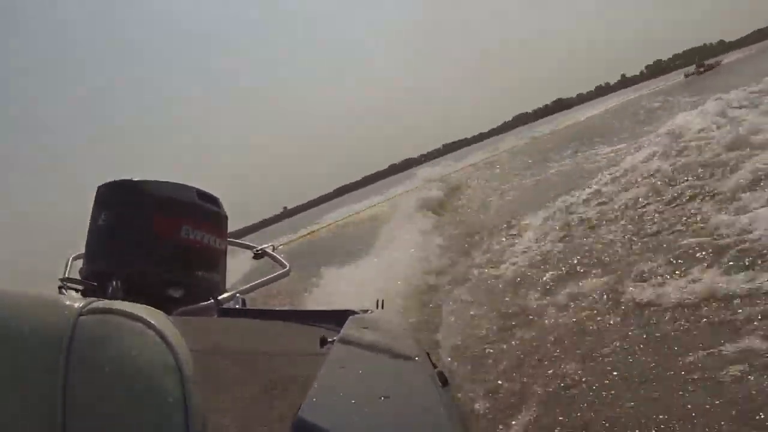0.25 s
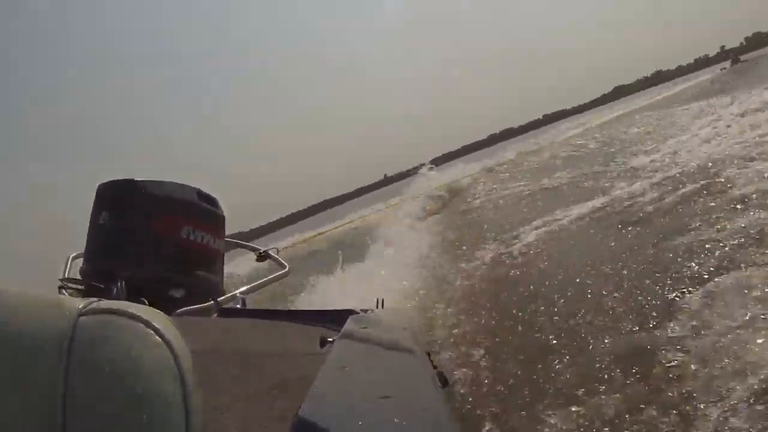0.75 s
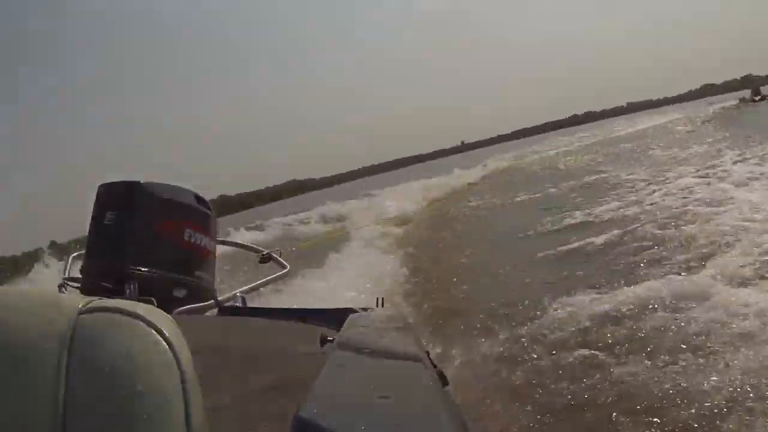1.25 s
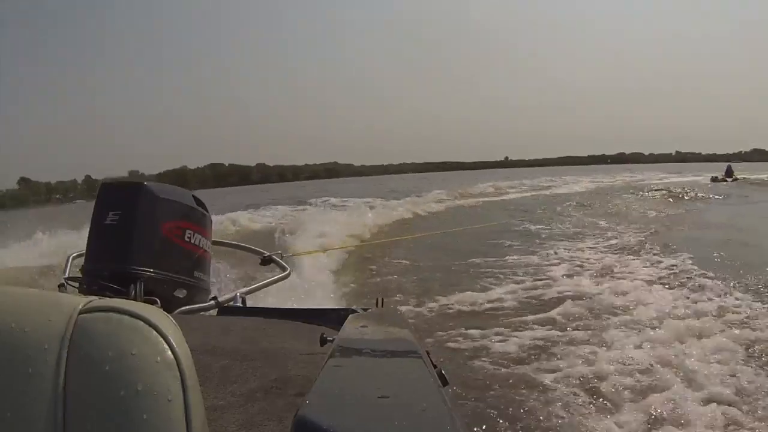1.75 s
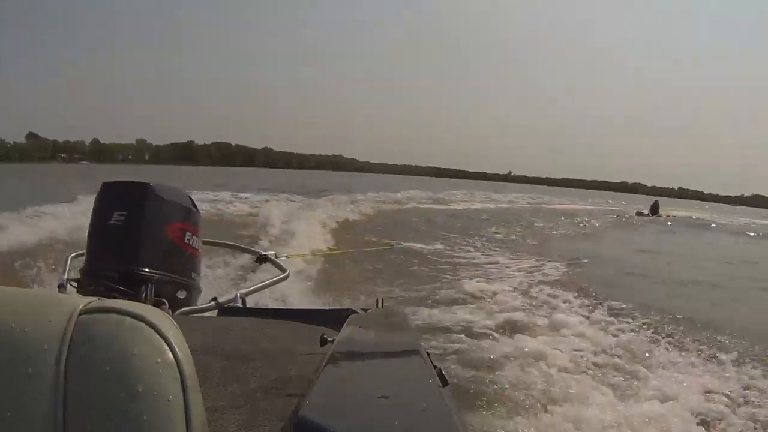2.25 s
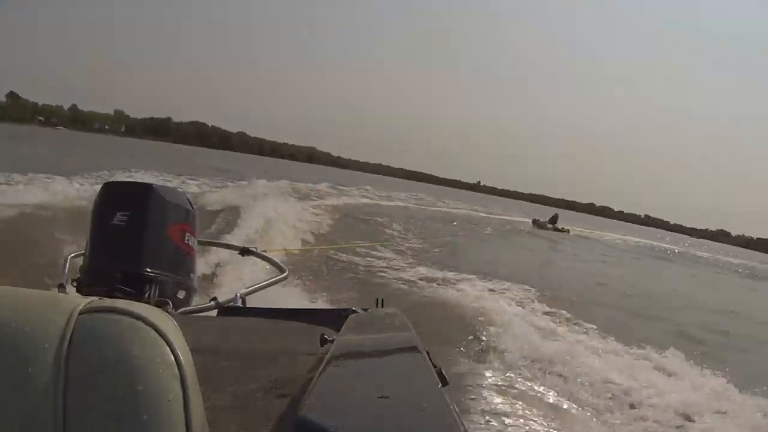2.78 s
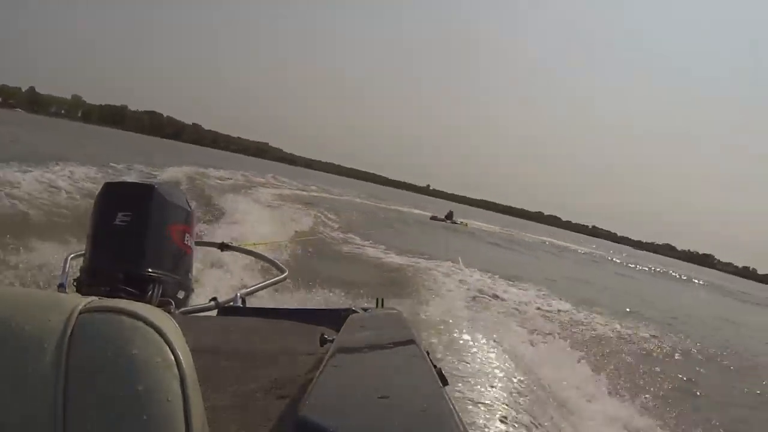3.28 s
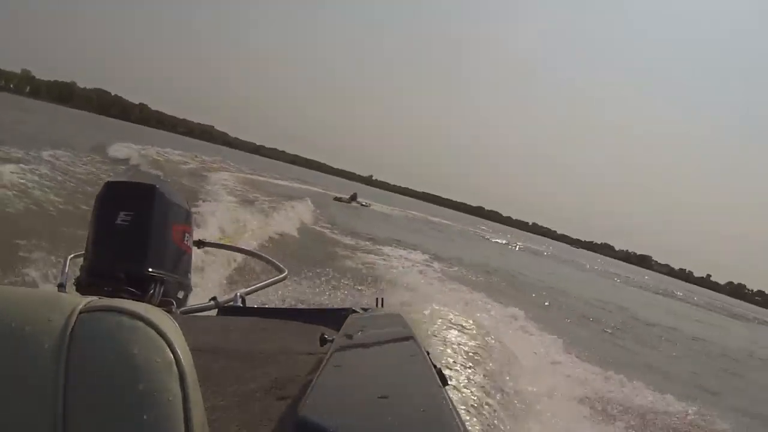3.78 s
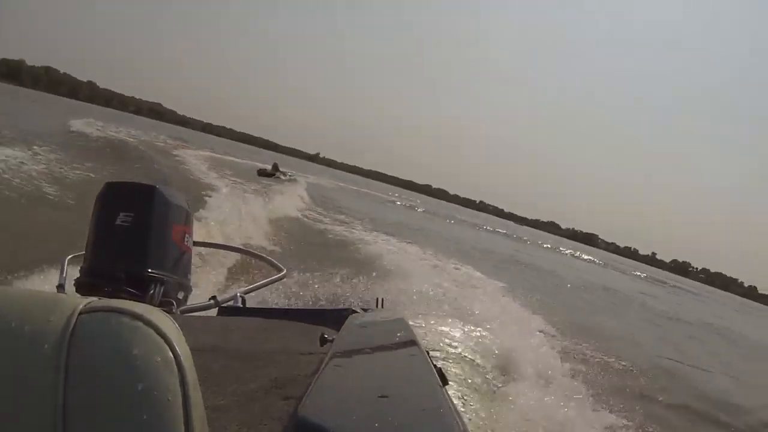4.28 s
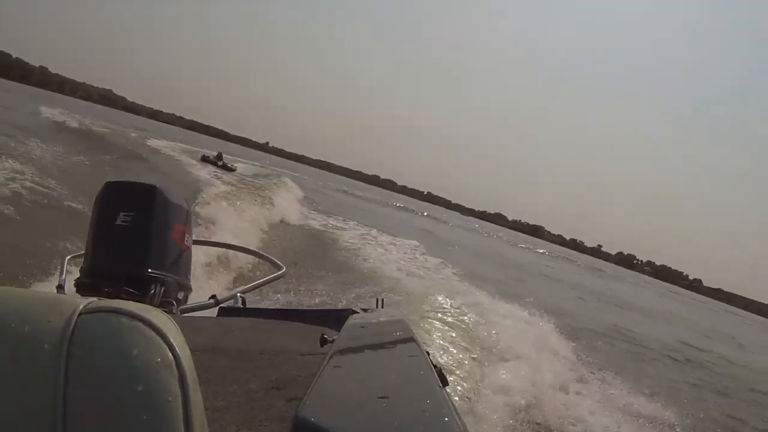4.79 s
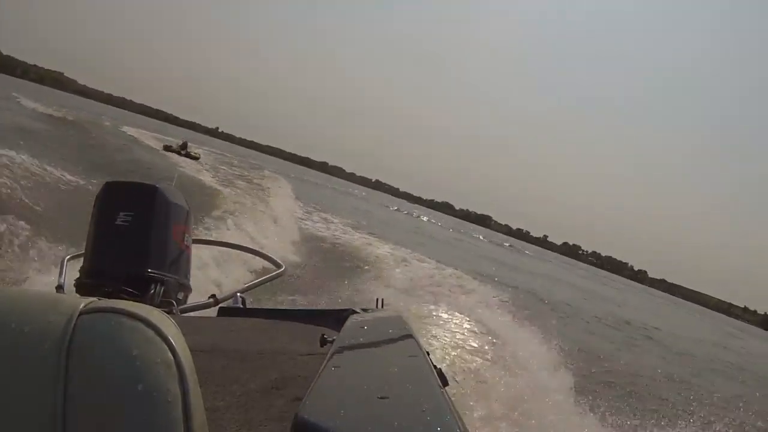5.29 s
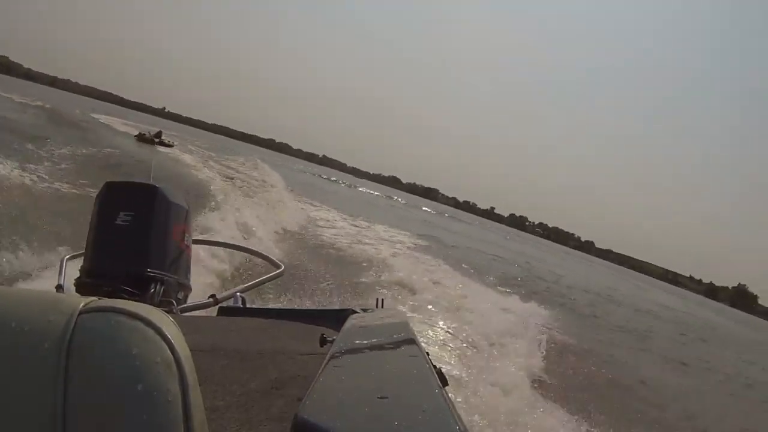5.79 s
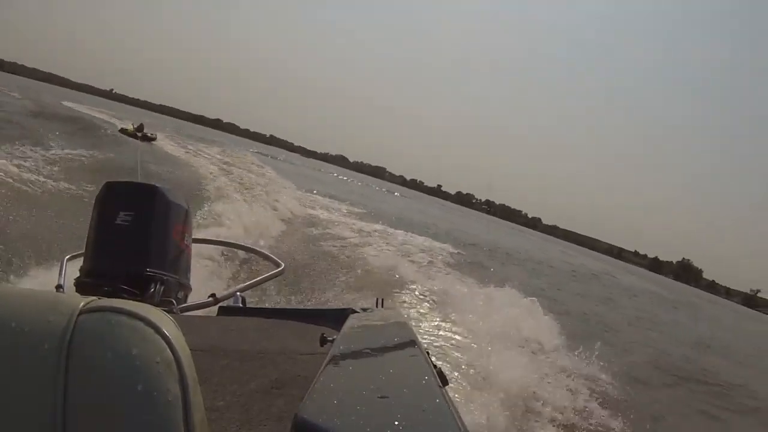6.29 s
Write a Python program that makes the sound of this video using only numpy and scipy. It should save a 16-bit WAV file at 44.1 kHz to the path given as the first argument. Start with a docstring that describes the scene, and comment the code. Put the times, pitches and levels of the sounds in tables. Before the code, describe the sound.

On board a speeding boat, the hull judders with a low rumble while the microphone's mount chatters with close, gritty knocks. Something loose clacks briefly. As the boat levels out, the outboard motor behind opens into a louder drone and snarl, and the wake churns and hisses with bursts of spray. The knocks thin to single thumps on the chop, the engine grows rougher and surges, and wind buffets the microphone throughout.

```python
"""A juddering hull and a chattering camera mount, close to a microphone fixed on board a boat in a fast turn.
As the boat levels out, the outboard motor opens up astern: engine tones and rough exhaust ring in its
leg and cowl as a drone and a snarl, while the wake churns and hisses with spray. Waves shake the hull,
the chop gives single knocks, something loose clacks early on and wind buffets the microphone."""
import sys
import numpy as np
from scipy import signal
from scipy.fft import rfft, irfft, next_fast_len
from scipy.io import wavfile

SR = 44100
rng = np.random.default_rng(int(sys.argv[2]) if len(sys.argv) > 2 else 0)


def store_pcm(level_fs):
    """Save levels as 16-bit WAV."""
    pcm = np.round(np.clip(level_fs, -1, 1) * 32767).astype(np.int16)
    wavfile.write(sys.argv[1], SR, np.atleast_2d(pcm).T)


N = 288409
TIME = np.arange(N) / SR
ROLL_START_S, ROLL_S = 1.16, 1.18  # the boat rolls out of its bank

# Knocks of the camera mount, right at the microphone. Each row: time in seconds, strength in dB.
MOUNT_KNOCKS = [(0.055, -14), (0.083, -19.5), (0.136, -20.5), (0.151, -14.5), (0.193, -15.5),
                (0.219, -11.5), (0.233, -11.5), (0.246, -18.5), (0.258, -13.5), (0.283, -11),
                (0.361, -14.5), (0.39, -13), (0.434, -11), (0.447, -18), (0.461, -12.5), (0.5, -13.5),
                (0.602, -17.5), (0.63, -10), (0.718, -19.5), (0.744, -12), (0.795, -16.5), (0.83, -21),
                (0.855, -13.5), (0.883, -14.5), (0.932, -19.5), (0.944, -13), (0.961, -15.5), (0.994, -16),
                (1.021, -20), (1.062, -14), (1.135, -12.5), (1.206, -16), (1.246, -12), (1.262, -14),
                (1.315, -16.5), (1.359, -14), (1.42, -12.5), (1.445, -15), (1.504, -15), (2.178, -13),
                (2.216, -17), (2.25, -14.5), (2.295, -15), (2.33, -12.5), (2.588, -13.5), (2.656, -13.5),
                (2.994, -10), (3.123, -11.5), (3.248, -11.5), (3.374, -12.5), (3.407, -14.5),
                (3.507, -14.5), (3.543, -15.5), (3.748, -14.5), (3.996, -12.5), (4.212, -15.5),
                (4.993, -11.5), (5.031, -19.5)]


def outboard(cruise_hz=44.77, throb=0.17, first_crest_s=4.397, surge_period_s=0.682, surge_db=2):
    """The motor astern: tones and exhaust noise, throbbing once a cycle, share the same resonances."""
    # Engine speed. Each row: time in seconds, cycles per second.
    engine_speed = [(0.0, 44.2), (0.36, 45.1), (0.8, 44.3), (1.02, 44.7), (1.37, 43.5), (1.42, 44.3),
                    (2.79, 44.5), (2.9, 44.1), (3.82, 45.1), (4.1, 44.6), (4.5, 45.2), (4.75, 44.5),
                    (5.04, 45.3), (5.45, 44.7), (6.08, 46.2), (6.21, 45.3), (6.36, 46.3), (6.54, 48.7)]
    # Low and high engine tones. Each row: multiple of the cycle, level in dB before the resonances.
    drone_orders = [(5, -3), (6, -5), (7, -2.5), (8, -4)]
    snarl_orders = [(11, -6), (12, -2.5), (13, -3.5), (14, -6), (18, 0), (19, 0.5), (24, -15)]
    # Resonances of the motor's leg and cowl. Each row: centre in Hz, width in Hz, gain in dB.
    drone_modes = [(217, 69, -7), (297.3, 46.5, -4.5), (342, 88, -8)]
    snarl_modes = [(502.8, 30.4, -3), (549, 68, -5.5), (608, 42, 1.5), (800.5, 98, -13), (1095, 200, -22.5)]
    speed, = curves(engine_speed)
    turns = np.cumsum(speed) / SR
    puffs = noise() * (1 + throb * np.cos(2 * np.pi * turns))
    roughness = gain_of(-10 + 1.36 * TIME)  # the exhaust grows rougher
    drone = engine_tones(turns, speed, drone_orders, drone_modes)
    drone += roughness * resonant(puffs, drone_modes)
    snarl = engine_tones(turns, speed, snarl_orders, snarl_modes)
    snarl += gain_of(3) * roughness * resonant(puffs, snarl_modes)
    # The drone opens early in the roll, grows with speed and fades late in the turn.
    drone *= rolled(banked_db=-27.5, level_db=-17, roll_s=0.69)
    drone *= gain_of(1.57 * (speed - cruise_hz) - 2 * np.maximum(TIME - 3.7, 0))
    # The snarl opens with the roll and keeps growing; later the engine labours in regular surges.
    surges = np.maximum((TIME - first_crest_s) / surge_period_s, -3 / 4)
    snarl *= rolled(banked_db=-34.5, level_db=-28)
    snarl *= gain_of(0.13 * TIME + surge_db * np.cos(2 * np.pi * surges))
    return drone + snarl


def engine_tones(turns, speed, orders, modes):
    """Multiples of the engine cycle swell and fade as the speed carries them through the resonances."""
    tones = np.zeros(N)
    for order, db in orders:
        flutter = gain_of(1.4 * wander(12))
        phase = 2 * np.pi * (order * turns + rng.random()) + .022 * order * wander(9)
        tones += np.sqrt(2) * gain_of(db) * response(order * speed, modes) * flutter * np.cos(phase)
    return tones


def hull(shake_hz=34, unsteady=0.083, hum_db=-30, drum_throb=0.4):
    """Under the microphone the hull hums and shakes at a low resonance on each wave; the deck drums."""
    # Waves that set the hull shaking. Each row: start in seconds, length in seconds, level in dB.
    waves = [(-.05, 0.65, -17.5), (.58, 0.42, -13.5), (1.08, 0.15, -25), (2.18, 0.36, -20.5),
             (2.52, 0.59, -21.5), (3.42, 0.53, -21.5), (3.92, 0.81, -17.5), (4.78, 0.92, -21),
             (5.53, 0.71, -23)]
    # Resonances of the deck and of the hull. Each row: centre in Hz, width in Hz, relative gain in dB.
    deck_modes = [(140.5, 15.4, 2), (199, 41, -3.5), (211.5, 13.6, -10)]
    hull_modes = [(73, 11, 0), (93, 12, -7)]
    wavering_hz = shake_hz * (1 + unsteady * wander(12.1))
    shake = np.sqrt(2) * np.sin(2 * np.pi * np.cumsum(wavering_hz) / SR)
    lurch = gain_of(1.8 * wander(14))
    judder = swells(waves, steady=gain_of(-29), shape=0.46) * lurch * shake
    # The deck drums around each knock, hardest when banked, and never quite stops.
    jolts = agitation(spread_s=0.021, lag_s=0.017) * rolled(banked_db=-6.5, level_db=-15)
    drumming = np.hypot(jolts, gain_of(-35))
    deck = drumming * resonant(noise() * (1 - drum_throb * shake), deck_modes)
    hum = gain_of(hum_db) * resonant(noise(), hull_modes)
    return judder + deck + hum


def camera_mount(chatter_per_s=70, rebound_s=.0065, rebound=0.3, grit=0.081, stiff_hz=125, soft_hz=5900):
    """Gritty knocks, their rebounds and a fine chatter all ring the housing around the microphone."""
    # Modes of the mount and housing. Each row: pitch in Hz, relative level in dB, t60 in seconds.
    housing_modes = [(140, -4, 0.068), (200, 6.5, 0.027), (673, 1.5, 0.0092), (1044, -7, 0.021),
                     (1106, -22.5, 0.032), (1630, -18, 0.0079), (2210, -14.5, 0.011), (2720, -34.5, 0.082),
                     (4240, -25.5, 0.0056), (5280, -28, 0.0063), (8900, -12.5, 0.0018),
                     (12400, -34, 0.0026)]
    t = np.arange(SR // 8) / SR
    chatter = np.hypot(gain_of(-11) * agitation(spread_s=0.096, lag_s=0.0089), gain_of(-32))
    blows = chatter * gain_of(-10 * rng.random(N)) * (rng.random(N) < chatter_per_s / SR)
    for s, db in MOUNT_KNOCKS:
        late, bounce = rng.uniform(0.7, 1.2, 2)
        add(blows, s + .0016, gain_of([db]))
        add(blows, s + rebound_s * late, gain_of([db]) * rebound * bounce)
    contact = signal.oaconvolve(blows, np.exp(-t / .0035))[:N]
    scrape = cut(grit * noise() * contact, 700, "high", order=1)
    ring = sum(gain_of(db - 60 * t / t60) * np.sin(2 * np.pi * hz * t) for hz, db, t60 in housing_modes)
    # The stiff mount passes little bass, and its plastic swallows most of the treble.
    ring = cut(ring, stiff_hz, "high", order=3)
    ring = cut(ring, soft_hz, "low", order=8) + 0.14 * cut(ring, soft_hz, "high", order=8)
    return signal.oaconvolve(blows + scrape, ring)[:N]


def wake(churn_follow=0.39, thinning_db_per_s=.5, drops_per_s=2500, drop_share=0.37):
    """Behind the stern, water churns and spray falls as hiss and drops; both open up with the roll."""
    # Sheets of spray thrown up by the stern. Each row: start in seconds, length in seconds, level in dB.
    splashes = [(.08, .3, -55), (1.5, 0.21, -52), (2.05, 0.93, -62), (2.55, 0.22, -48), (2.78, 0.24, -44),
                (3.48, 0.19, -42.5), (3.95, 0.6, -47), (4.65, 0.43, -49), (5.35, .24, -47.5),
                (6.03, 0.32, -44)]
    # Spectra of the churn and of the spray. Each row: frequency in Hz, relative level in dB.
    churn_colour = [(200, 1), (430, 3.5), (700, 2), (890, -4.5), (1060, 3), (1400, -11.5), (1630, -9),
                    (1920, -15.5), (2300, -10.5), (3200, -14), (3900, -28), (15000, -86)]
    spray_colour = [(1500, -12), (3300, -2), (4200, -1), (4650, 2), (5300, -2), (6300, -11.5), (7200, -3),
                    (8000, -10.5), (9500, -10.5), (11000, -16), (12500, -13.5), (13500, -18), (15200, -29)]
    thinning = gain_of(-thinning_db_per_s * TIME)
    steady = rolled(banked_db=-59, level_db=-44) * thinning
    sheets = swells(splashes, steady, shape=0.66)
    churn_gain = rolled(banked_db=-37.5, level_db=-29) * thinning * (sheets / steady) ** churn_follow
    churn = coloured(noise() * gain_of(1.47 * wander(48)), churn_colour)
    drops = evened(noise() * (rng.random(N) < drops_per_s / SR))
    spray = coloured((noise() + drop_share * drops) * gain_of(1.1 * wander(33)), spray_colour)
    return churn_gain * churn + sheets * spray


def wind():
    """Lumpy low buffeting right on the microphone: a steady airstream with a few gusts."""
    # Gusts. Each row: start in seconds, length in seconds, level in dB.
    gusts = [(1.5, 0.32, -22), (2.14, 0.3, -19.5), (2.98, 0.26, -22), (3.28, 0.16, -14), (3.5, 0.66, -24.5),
             (6.05, 0.44, -26.5)]
    # Spectrum of the buffeting. Each row: frequency in Hz, relative level in dB.
    wind_colour = [(20, -18), (55, 0.5), (100, -4), (119, 15), (136, 9), (160, -10), (240, -13.5),
                   (420, -15.5), (900, -58)]
    airstream = swells(gusts, steady=rolled(banked_db=-28, level_db=-29.5), shape=1.0)
    lumps = gain_of(2 * wander(12))
    return airstream * lumps * coloured(noise(), wind_colour)


def loose_clacks(burst_s=.0075):
    """Somewhere on board, something hard and light rattles against the boat in short bursts."""
    # Clacks. Each row: start in seconds, level in dB.
    clacks = [(.725, -34), (.764, -18), (.808, -35), (.837, -35)]
    # Their bright spectrum. Each row: frequency in Hz, relative level in dB.
    clack_colour = [(600, -16), (1500, -2), (2000, -5), (2700, 3), (3150, -7), (3900, -21), (5500, -25),
                    (7500, -38), (15000, -50)]
    bursts = np.zeros(N)
    for s, db in clacks:
        age = np.maximum(TIME - s, 0) / burst_s
        bursts += gain_of(db) * np.minimum(10 * age, 1) * np.exp(-age ** 4)
    return bursts * coloured(noise(), clack_colour)


def rolled(banked_db, level_db, roll_s=ROLL_S):
    """A gain that moves from its banked to its level value as the boat rolls out."""
    progress = np.clip((TIME - ROLL_START_S) / roll_s, 0, 1)
    return gain_of(banked_db + (level_db - banked_db) * np.sin(np.pi * progress / 2) ** 2)


def agitation(spread_s, lag_s):
    """How hard the boat is being shaken: the strength of the knocks around each moment."""
    t = TIME[::64]
    power = sum(gain_of(db) ** 2 * np.exp(-((t - s - lag_s) / spread_s) ** 2) for s, db in MOUNT_KNOCKS)
    return np.interp(TIME, t, np.sqrt(power))


def swells(rows, steady, shape):
    """Each event rises and falls in one arch over a steady gain; a small shape flattens the top."""
    power = steady ** 2
    for s, length, db in rows:
        arch = abs(np.sin(np.pi * np.clip((TIME - s) / length, 0, 1))) ** shape
        power = power + (gain_of(db) * arch) ** 2
    return np.sqrt(power)


def response(hz, modes):
    """Gain of a set of steep-sided resonances."""
    return sum(gain_of(db) / (1 + (2 * (hz - centre) / width) ** 4) for centre, width, db in modes)


def resonant(x, modes):
    """Passes x through resonances; rms 1."""
    return filtered(x, lambda hz: response(hz, modes))


def coloured(x, points):
    """Shapes x by a spectrum of (Hz, dB) points that falls away below the first; rms 1."""
    point_hz, db = np.transpose(points)

    def colour(hz):
        bass_rolloff = np.minimum(hz / point_hz[0], 1) ** 2
        return gain_of(np.interp(np.log(hz + 1), np.log(point_hz), db)) * bass_rolloff
    return filtered(x, colour)


def filtered(x, gain_at):
    """Applies a gain given as a function of frequency; rms 1."""
    size = next_fast_len(N)
    hz = np.fft.rfftfreq(size, 1 / SR)
    return evened(irfft(rfft(x, size) * gain_at(hz), size)[:N])


def cut(x, hz, kind, order):
    """A causal high-pass or low-pass."""
    return signal.sosfilt(signal.butter(order, hz, kind, fs=SR, output="sos"), x)


def wander(rate_hz):
    """Smooth random drift, mostly slower than the rate; rms 1."""
    return filtered(noise(), lambda hz: np.exp(-(hz / rate_hz) ** 2))


def noise():
    """White noise."""
    return rng.standard_normal(N)


def gain_of(db):
    """Decibels to amplitude."""
    return 10 ** (np.asarray(db) / 20)


def evened(x):
    """Scales to rms 1."""
    return x / np.sqrt(np.mean(x ** 2) + 1e-20)


def curves(rows):
    """Each column of a time table, joined by straight lines."""
    s, *columns = np.transpose(rows)
    return [np.interp(TIME, s, column) for column in columns]


def add(mix, s, sound):
    """Mixes a sound in at time s."""
    part = mix[max(round(s * SR), 0):][:len(sound)]
    part += sound[:len(part)]


def scene():
    """All sources at the one microphone on board."""
    return (outboard() + hull() + wind() + wake() + camera_mount() + loose_clacks())[None]


def record(dry):
    """The camera's case notches the treble, the highest peaks are rounded off and the band is limited."""
    # Narrow bands of the case, mostly dips. Each row: centre in Hz, width in Hz, gain in dB.
    case_bands = [(2493, 43, -5), (3846, 106, -7), (4940, 86, -6), (6600, 160, 0.5), (11100, 210, -6)]
    ceiling, edge_hz = .88, 15200
    hz = np.fft.rfftfreq(N, 1 / SR)
    case_db = sum(db * np.exp(-((hz - centre) / width) ** 2) for centre, width, db in case_bands)
    heard = irfft(rfft(dry) * gain_of(case_db), N)
    heard = cut(heard, 15, "high", order=2)
    heard = heard / (1 + (heard / ceiling) ** 6) ** (1 / 6)
    band_limit = signal.firwin(511, edge_hz, window=("kaiser", 9), fs=SR)
    return signal.oaconvolve(heard, band_limit[None], "same")


dry = scene()
out = record(dry)
store_pcm(out)
```